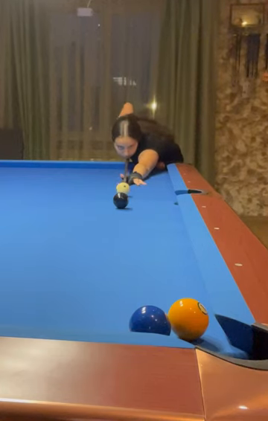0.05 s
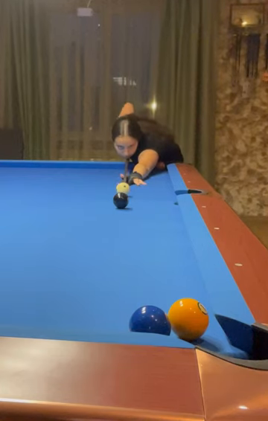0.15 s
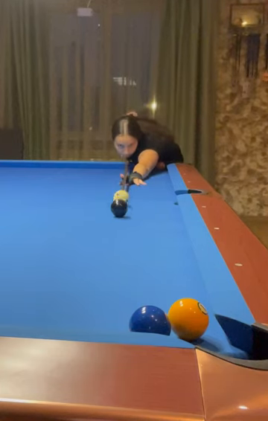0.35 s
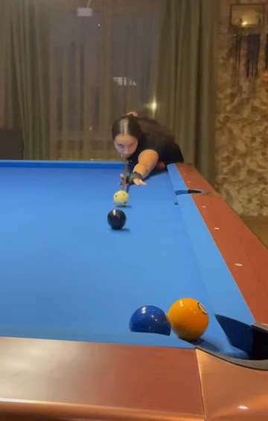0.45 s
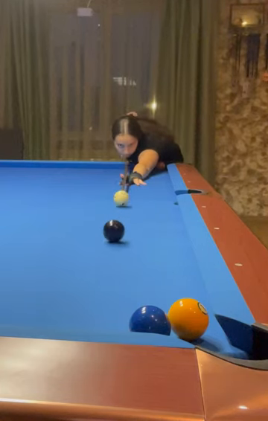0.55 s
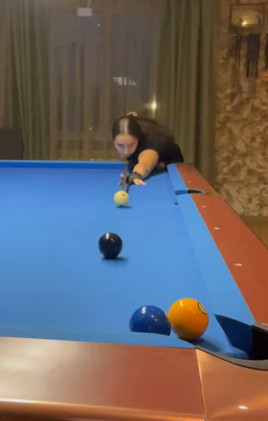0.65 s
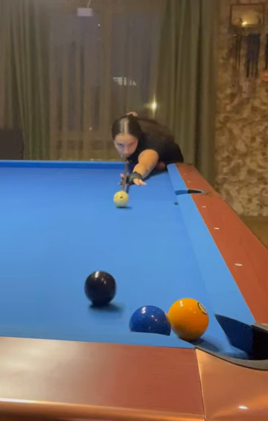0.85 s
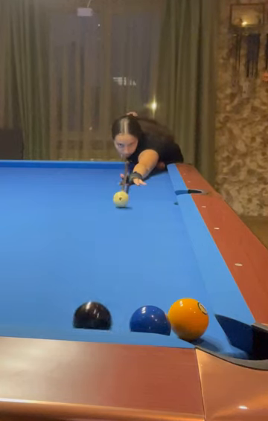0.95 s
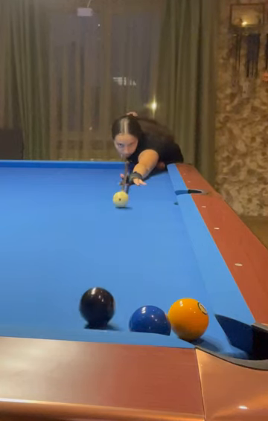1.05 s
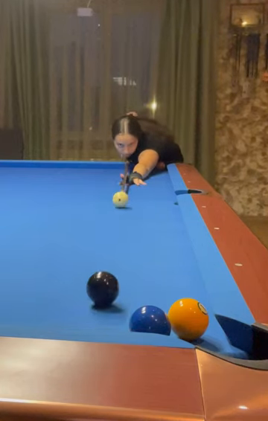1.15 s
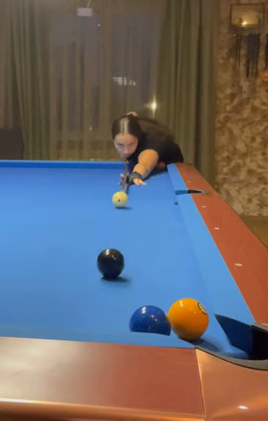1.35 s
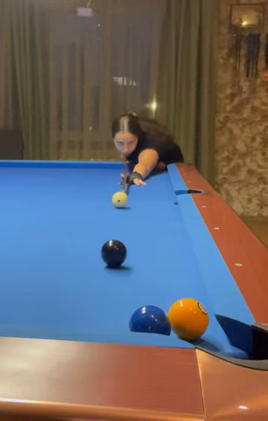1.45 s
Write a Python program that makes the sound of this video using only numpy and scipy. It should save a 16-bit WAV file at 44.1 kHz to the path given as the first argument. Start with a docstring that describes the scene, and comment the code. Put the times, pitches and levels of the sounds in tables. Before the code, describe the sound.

A single pool shot in a quiet, live room, heard from the table's foot. A faint cue swish leads to a dull, woody knock at 0.2 seconds. At 0.3 a very loud, hard ball-on-ball crack bursts out, with quick echoes and a bright tail fading over nearly a second. Low rolling rumble follows; around 1.0 faint ticks and a soft, low cushion thud, then rumble rolling away.

```python
"""A live room, at the foot of a pool table: one shot is played over a quiet background.
The cue swishes over the hand as filtered noise and knocks the cue ball: a short pulse and shaft modes.
The cue ball cracks into the black: a very short pulse, discrete echoes and a diffuse reverberant tail.
The black rumbles over the slate as noise, ticks and thuds into the near cushion, and rolls back.
A limiter ducks the room after the crack, and the level slowly recovers."""
import sys
import numpy as np
from scipy import signal
from scipy.fft import irfft
from scipy.io import wavfile
from scipy.ndimage import uniform_filter1d, minimum_filter1d

SR = 44100
rng = np.random.default_rng(int(sys.argv[2]) if len(sys.argv) > 2 else 0)


def log_audio(samples):
    """Write samples as a 16-bit WAV file to the path given in sys.argv[1]."""
    # one column per channel
    frames = np.atleast_2d(samples).T
    # limit to full scale, then quantise
    limited = np.clip(frames, -1, 1)
    pcm = np.round(limited * 32767).astype(np.int16)
    wavfile.write(sys.argv[1], SR, pcm)


N = 66150
T = np.arange(N) / SR  # time axis [s]
DECAY_60_DB = np.log(1000)  # exponent of a 60 dB decay
# In every spectrum table below, the levels are relative: each sound is normalised before its gain.


def amp(db):
    """Level definition: 20 dB is a factor of ten in amplitude."""
    return 10 ** (np.asarray(db) / 20)


def read(points, hz):
    """Logarithmic frequency scale: interpolates a table of (frequency [Hz], value) along it."""
    table_hz, value = np.transpose(points)
    return np.interp(np.log(hz + 1), np.log(table_hz + 1), value)


def place(start_s, sound, pan_db=0):
    """Interchannel level difference: a delayed sound leans left by pan_db."""
    stereo = sound * np.ones((2, 1))
    delay = max(round(start_s * SR), 0)
    late = np.pad(stereo, ((0, 0), (delay, N)))[:, :N]
    return late * amp([[pan_db / 2], [-pan_db / 2]])


def pulse(spectrum, lag_s=0, lag_hz=1000):
    """Minimum phase and dispersion: a click of peak 1 whose bass, under lag_hz, is up to lag_s late."""
    hz = np.fft.fftfreq(16384, 1 / SR)
    log_gain = np.log(amp(read(spectrum, abs(hz))))
    minimum_phase = np.conj(signal.hilbert(log_gain))
    # this phase slope delays by lag_s at 0 Hz and by half of that at lag_hz
    dispersion = -2j * np.pi * lag_s * lag_hz * np.arctan(hz / lag_hz)
    click = np.fft.ifft(np.exp(minimum_phase + dispersion)).real[:len(hz) // 2]
    return click / abs(click).max()


# Interchannel correlation of a diffuse field: (frequency [Hz], correlation [-1 to 1])
CORRELATION = [(60, .9), (150, 0.7), (300, 0.5), (550, -.1), (1200, .05), (2400, 0.1), (5000, 0),
               (9000, -.2), (15000, 0)]


def diffuse(spectrum):
    """Diffuse field: random-phase noise of rms 1, alike in the bass and mostly unrelated in the treble."""
    hz = np.fft.rfftfreq(N, 1 / SR)
    mid, side = np.exp(2j * np.pi * rng.random((2, len(hz))))
    correlation = np.clip(read(CORRELATION, hz), -1, 1)
    mid = mid * np.sqrt(1 + correlation)
    side = side * np.sqrt(1 - correlation)
    noise = irfft(np.array([mid + side, mid - side]) * amp(read(spectrum, hz)), N)
    return noise / noise.std()


SCATTER_S = .008  # time to decay by a factor e


def scatter(spectrum):
    """Scattering: cloth and rails return a brief flurry of reflections with exponential decay."""
    onset = np.minimum(T / .001, 1)
    return diffuse(spectrum) * np.exp(-T / SCATTER_S) * onset


# Reverberation time of the room: (frequency [Hz], t60 [s])
ROOM_DECAY = [(80, 1.0), (300, 0.98), (700, 0.8355), (2000, 0.9445), (3500, 0.82), (6000, 0.5671),
              (9000, .5), (15000, 0.27)]
ROOM_GAP_S, ROOM_BUILD_S = 0.00092, 0.0071  # silence before the tail, time constant of its growth


def room(spectrum):
    """Reverberation: a diffuse field builds up, then each band dies at its own rate."""
    hz, t, bands = signal.stft(diffuse(spectrum), SR, nperseg=512)
    decay = np.exp(-DECAY_60_DB * t / read(ROOM_DECAY, hz)[:, None])
    tail = signal.istft(bands * decay, SR)[1][:, :N]
    build_up = 1 - np.exp(-np.maximum(T - ROOM_GAP_S, 0) / ROOM_BUILD_S)
    return tail * build_up


def ring(modes, rise_s, apart_hz):
    """Modal decay: damped sines, increasingly out of step between the channels towards apart_hz."""
    phases = rng.uniform(0, 2 * np.pi, len(modes))
    offsets = rng.standard_normal((len(modes), 2, 1))
    tones = 0
    for (hz, db, t60), phase, offset in zip(modes, phases, offsets):
        decay = amp(db) * np.exp(-DECAY_60_DB * T / t60)
        tones = tones + decay * np.sin(2 * np.pi * hz * T + phase + offset * hz / apart_hz)
    return tones * (1 - np.exp(-T / rise_s))


# Background of the room: (frequency [Hz], level [dB])
FLOOR_SPECTRUM = [(25, -1.5), (65, 5), (120, -2.5), (250, -8.5), (500, -14), (950, -8.5), (1500, -25.5),
                  (4000, -33), (8000, -31.5), (11000, -39.5), (15000, -38)]
FLOOR_DB = -67.5  # rms level


def background():
    """Stationary noise: the quiet room is a steady diffuse field."""
    return amp(FLOOR_DB) * diffuse(FLOOR_SPECTRUM)


CUE_S = .2056  # time of the cue strike
SLIDE_DB, SLIDE_RISE_DB_PER_S = -60, 277.5  # rms level at the strike, slope before and after it
# Friction noise of the shaft on the bridge hand: (frequency [Hz], level [dB])
SLIDE_SPECTRUM = [(100, -10), (1300, 6.5), (2500, 0), (4500, -3.5), (8500, -3), (11000, -21.5),
                  (14000, -10.5), (16500, -20)]


def slide():
    """Friction noise: the cue swishes over the hand, swelling up to the strike and fading after it."""
    level_db = SLIDE_DB - SLIDE_RISE_DB_PER_S * abs(T - CUE_S)
    return amp(level_db) * diffuse(SLIDE_SPECTRUM)


# Knock of the leather tip: (frequency [Hz], level [dB])
CUE_SPECTRUM = [(20, -62), (70, -41.5), (200, -10.5), (450, -4.5), (780, -0.5), (1300, -7.5), (1900, -18.5),
                (2700, -23), (3700, -41), (9000, -38.5), (11000, -53), (15000, -39)]
# Sound the knock sends into the room: (frequency [Hz], level [dB])
CUE_ROOM_SPECTRUM = [(20, -50.5), (60, -25.5), (120, -7.5), (250, -5.5), (330, -1.5), (700, 0), (950, -2),
                     (1500, -10), (2600, -8.5), (3800, -21.5), (5200, -27), (9500, -30.5), (10500, -56.5),
                     (11800, -52.5), (13000, -32), (16000, -42)]
# Modes of the cue shaft, levels before the onset: (frequency [Hz], level [dB], t60 [s])
SHAFT_MODES = [(171.6, -36, 0.51), (455, -33.5, 0.5), (733.2, -37, .3), (922, -35.5, .4),
               (1814, -34.5, 0.27), (2213, -38, .5), (2585, -22.5, .05), (3000, -45.5, .24),
               (3237, -39, .17), (4080, -40, .1)]
CUE_DB, CUE_SCATTER_DB = -14.5, -17.5  # knock peak before panning; scatter relative to it
CUE_ROOM_DB = -27  # reverberation before build-up and decay
CUE_LAG_S, CUE_LAG_HZ = 0.00174, 805  # the late bass makes the knock fall in pitch
SHAFT_DELAY_S = .009


def cue():
    """Impact excitation: the tip knocks the cue ball; the shaft modes and the room ring on."""
    click = amp(CUE_DB) * pulse(CUE_SPECTRUM, CUE_LAG_S, CUE_LAG_HZ)
    knock = place(CUE_S, click, pan_db=-4.5)
    shaft = place(CUE_S + SHAFT_DELAY_S, ring(SHAFT_MODES, rise_s=0.0037, apart_hz=894), pan_db=-4)
    scattered = amp(CUE_DB + CUE_SCATTER_DB) * scatter(CUE_ROOM_SPECTRUM)
    reverberant = amp(CUE_ROOM_DB) * room(CUE_ROOM_SPECTRUM)
    return knock + shaft + place(CUE_S, scattered + reverberant, pan_db=-1.5)


# Course of the rumble, heard only after the cue strike: (time [s], level [dB])
ROLL_COURSE = [(.2, -55), (.3, -45), (.55, -48), (.75, -49), (.95, -56.5), (1.02, -50), (1.14, -43),
               (1.3, -48), (1.5, -54)]
# Rumble of the slate: (frequency [Hz], level [dB])
ROLL_SPECTRUM = [(20, -41.5), (42, -23), (68, 3.5), (82, -4), (98, 1.5), (118, 2), (145, -9.5), (172, 0),
                 (210, -14.5), (340, -14), (500, -27.5), (700, -39), (920, -28.5), (1400, -57), (3500, -75),
                 (9000, -91.5)]


def rolling():
    """Rolling noise: the slate rumbles under the ball as noise of varying level."""
    level_db = np.interp(T, *np.transpose(ROLL_COURSE))
    level = amp(level_db) * (T > CUE_S)
    return place(0, level * diffuse(ROLL_SPECTRUM), pan_db=-1.5)


# Crack of ball on ball: (frequency [Hz], level [dB])
CRACK_SPECTRUM = [(20, -41.5), (60, -16.5), (110, -25), (300, -14), (600, -13), (1100, -9.5), (1600, 0.5),
                  (1980, 3.5), (2380, -8.5), (2800, -0.5), (3250, -10), (4000, -21.5), (5200, -49.5),
                  (6500, -33), (8500, -52), (10800, -71.5), (13500, -58), (15100, -32.5), (16500, -54)]
# Sound the crack sends into the room: (frequency [Hz], level [dB])
CRACK_ROOM_SPECTRUM = [(20, -47.5), (100, -24), (350, -23), (750, -12), (1300, -6.5), (2200, 0), (2900, -3),
                       (3900, -15.5), (5100, -35), (7000, -35), (9600, -35.5), (10400, -65), (11800, -61.5),
                       (12600, -39.5), (14800, -28), (16200, -49)]
# First echoes, levels relative to the crack: (delay [s], level [dB], left-right difference [dB])
CRACK_ECHOES = [(.0032, -22, 0.5), (.0078, -18, -3.5), (0.0231, -18, 0), (0.0325, -17, 1), (.0345, -21, 1),
                (.070, -26, -2)]
CRACK_S = .3006
CRACK_DB, CRACK_SCATTER_DB = 10, -19  # peak before panning and limiting; scatter relative to it
CRACK_ROOM_DB = -17  # reverberation before build-up, decay and limiting
CRACK_LAG_S, CRACK_LAG_HZ = .0005, 2460  # delay of the bass


def crack():
    """Elastic collision: two hard balls give one very short pulse, its echoes and a long bright tail."""
    click = amp(CRACK_DB) * pulse(CRACK_SPECTRUM, CRACK_LAG_S, CRACK_LAG_HZ)
    direct = place(CRACK_S, click, pan_db=-1)
    echoes = sum(place(CRACK_S + delay, amp(db) * click, pan) for delay, db, pan in CRACK_ECHOES)
    scattered = amp(CRACK_DB + CRACK_SCATTER_DB) * scatter(CRACK_ROOM_SPECTRUM)
    reverberant = amp(CRACK_ROOM_DB) * room(CRACK_ROOM_SPECTRUM)
    return direct + echoes + place(CRACK_S, scattered + reverberant)


# Clicks of the ball on the cushion: (time [s], peak level [dB])
TICK_TIMES = [(0.9873, -37), (0.9948, -41)]
# Sound of each click: (frequency [Hz], level [dB])
TICK_SPECTRUM = [(40, -25), (200, -9), (1000, -12.5), (1850, -2.5), (2400, -9.5), (3200, -23.5),
                 (5000, -30.5), (8000, -28.5), (11000, -49), (15000, -29)]
# Push of the yielding rubber: (frequency [Hz], level [dB])
PUSH_SPECTRUM = [(30, -38), (95, 2), (170, -1), (230, -6), (315, 9), (460, -2), (560, -13), (660, -9.5),
                 (900, -25.5), (1400, -51), (4000, -81)]
# Modes of rail and table body, levels before the onset: (frequency [Hz], level [dB], t60 [s])
RAIL_MODES = [(98.4, -46, 0.39), (112, -47.5, 2), (125.2, -41, 1.4), (179.4, -42, 0.21), (235, -40, 0.64),
              (312, -35.5, 0.7), (354, -39, 0.9), (453.6, -37.5, 0.18), (527.5, -38, 0.29),
              (658, -42, 0.18), (937, -57, 0.35)]
# Sound the thud sends into the room: (frequency [Hz], level [dB])
THUD_ROOM_SPECTRUM = [(20, -36), (35, -33), (60, -9), (120, -5), (190, -5.5), (330, 2), (500, -8.5),
                      (750, -20), (1200, -37), (2200, -47), (4000, -81.5), (9000, -96)]
CUSHION_S = 0.98
TICK_SCATTER_DB = -12.5  # relative to the peak of each tick
PUSH_DB, PUSH_LAG_S, PUSH_LAG_HZ = -34, .034, 328.7  # peak; the late bass makes the pitch fall
RAIL_DELAY_S, RAIL_RISE_S = 0.004584, 0.017
THUD_ROOM_DB, THUD_ROOM_DELAY_S = -37, .013  # level before build-up, decay and panning


def cushion():
    """Compliant impact: the ball ticks on rubber, which gives and pushes the rail into a low thud."""
    ticks = 0
    for tick_s, db in TICK_TIMES:
        click = place(tick_s, amp(db) * pulse(TICK_SPECTRUM))
        scattered = place(tick_s, amp(db + TICK_SCATTER_DB) * scatter(TICK_SPECTRUM))
        ticks = ticks + click + scattered
    push = place(CUSHION_S, amp(PUSH_DB) * pulse(PUSH_SPECTRUM, PUSH_LAG_S, PUSH_LAG_HZ))
    modes = ring(RAIL_MODES, rise_s=RAIL_RISE_S, apart_hz=690)
    rail = place(CUSHION_S + RAIL_DELAY_S, modes, pan_db=-3.0)
    tail = amp(THUD_ROOM_DB) * room(THUD_ROOM_SPECTRUM)
    reverberant = place(CUSHION_S + THUD_ROOM_DELAY_S, tail, pan_db=-2.0)
    return ticks + push + rail + reverberant


def scene():
    """Superposition: the sounds of the shot add to the quiet room."""
    return background() + slide() + cue() + rolling() + crack() + cushion()


CEILING_DB, RECOVER_DB_PER_S = -0.5, 45.5  # limiter threshold re full scale, speed of its release
EDGE_HZ = 16500  # upper band limit


def record(dry):
    """Gain reduction and band limiting: a look-ahead limiter drops at peaks and slowly recovers."""
    peak_db = 20 * np.log10(abs(dry).max(0) + 1e-9)
    over_db = np.maximum(peak_db - CEILING_DB, 0)
    fall_db = T * RECOVER_DB_PER_S
    reduction_db = np.maximum.accumulate(over_db + fall_db) - fall_db
    # the centred windows [samples] bring the drop forward and smooth it
    gain_db = uniform_filter1d(minimum_filter1d(-reduction_db, size=65), size=65)
    low_pass = signal.firwin(511, EDGE_HZ, window=("kaiser", 9), fs=SR)
    return signal.oaconvolve(dry * amp(gain_db), low_pass[None], "same")


dry = scene()
out = record(dry)
log_audio(out)
```